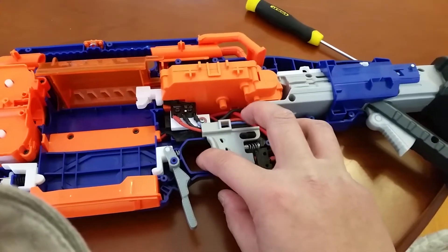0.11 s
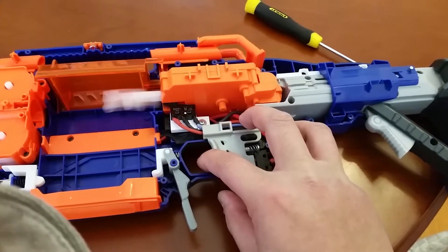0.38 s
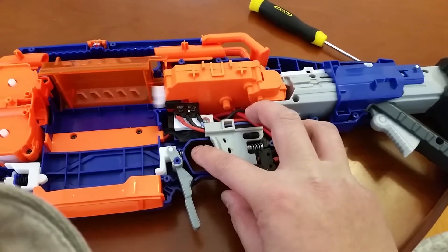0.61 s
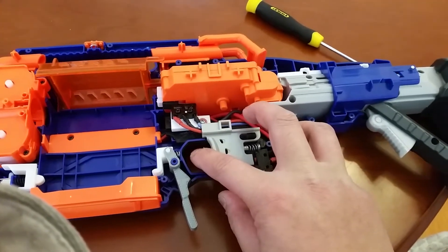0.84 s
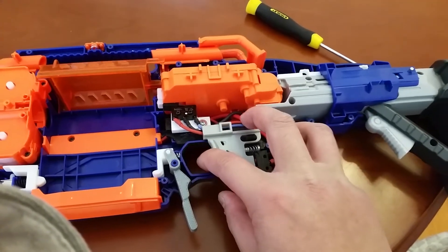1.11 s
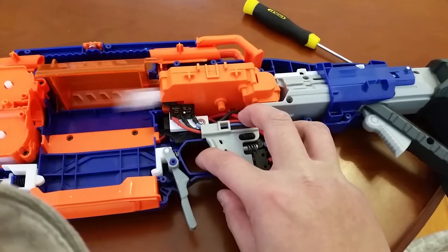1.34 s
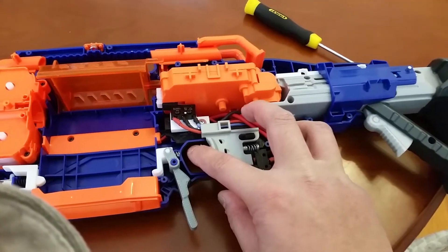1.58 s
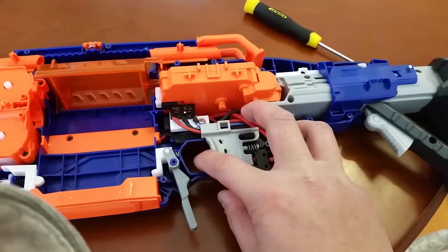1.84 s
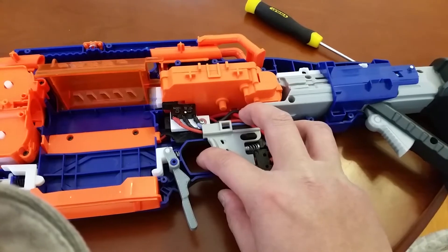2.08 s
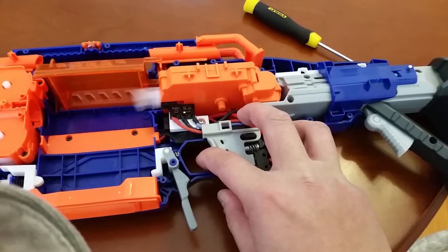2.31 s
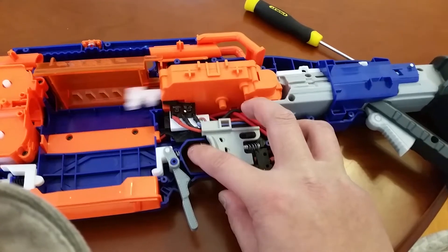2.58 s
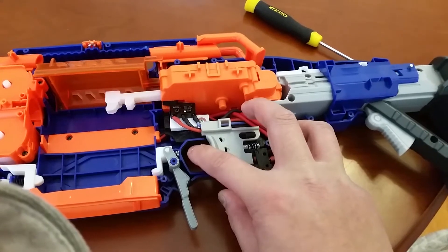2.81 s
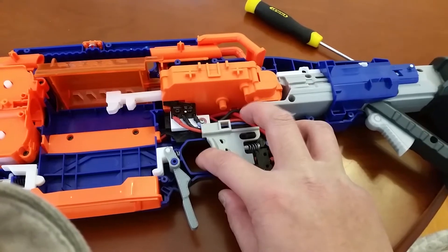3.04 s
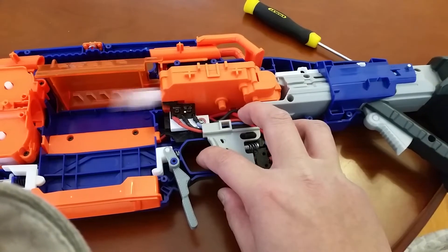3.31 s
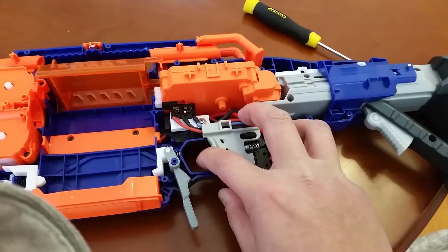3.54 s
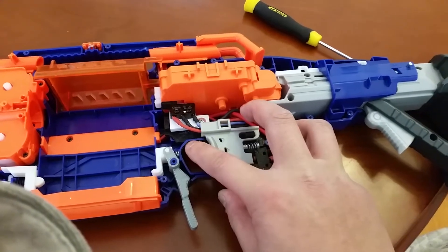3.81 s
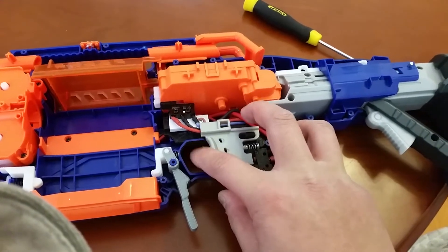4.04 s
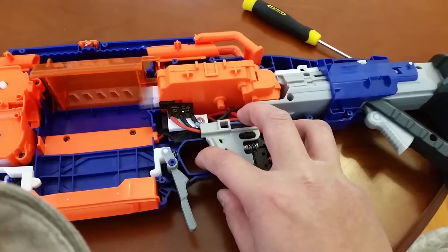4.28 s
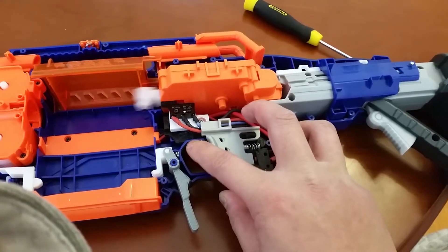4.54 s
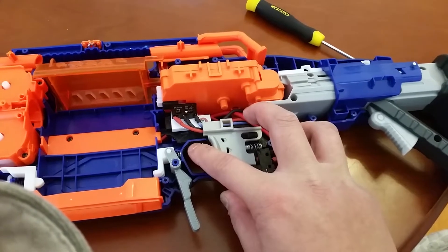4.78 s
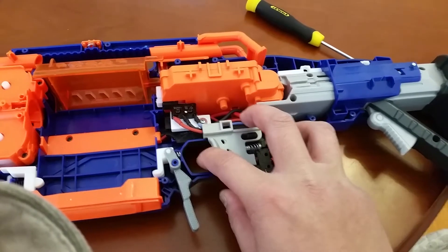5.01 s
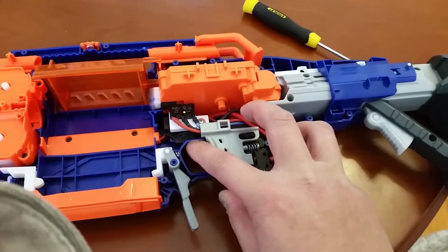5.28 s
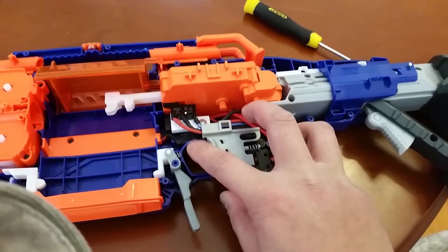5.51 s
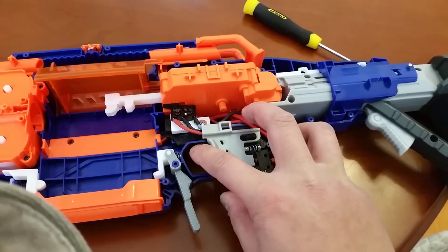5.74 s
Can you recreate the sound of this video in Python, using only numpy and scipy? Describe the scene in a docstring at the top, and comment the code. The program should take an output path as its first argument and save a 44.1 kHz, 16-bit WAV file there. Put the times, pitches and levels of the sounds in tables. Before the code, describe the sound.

An opened toy blaster lies on a table in a quiet, echoing room. Its little electric motor is pressed on six times: each burst jumps up to a harsh, whining gear buzz, then slides down in pitch and stalls. Sharp plastic switch ticks come shortly before the last four bursts. Faint low room rumble and mains hum fill the gaps. Close stereo microphones.

```python
"""Mains hum and room air run throughout; at first the room still rings from a press before time zero.
Six presses follow: a three-pole motor spins up, whines through a plastic gearbox and coasts to rest.
The motor is shaft tones and tooth rattle through resonances of housing, shell and table top; switch
ticks (noise snap, short plastic rings) come shortly before the last four presses.
An opened toy blaster on a table in a quiet, echoing room, heard by two spaced microphones."""
import sys
import numpy as np
from scipy import signal
from scipy.fft import rfft, irfft, next_fast_len
from scipy.io import wavfile
from scipy.ndimage import uniform_filter1d

SR = 44100
rng = np.random.default_rng(int(sys.argv[2]) if len(sys.argv) > 2 else 0)


def volts(x):
    """Linear amplitude factor 10**(x/20) for a level x in dB, scalar or array-like."""
    e = np.asarray(x, float) / 20
    return 10 ** e


def to_wav(sig):
    """Store sig (one row per channel, or 1-D mono) as 16-bit WAV at the path in sys.argv[1].

    Samples outside -1..1 are clipped; the rate is SR.
    """
    pcm = np.clip(np.atleast_2d(sig), -1, 1) * 32767
    pcm = np.round(pcm).astype(np.int16)
    wavfile.write(sys.argv[1], SR, pcm.T)  # frames by channels


N = 259124
LEAD = SR // 2  # samples computed before time zero
SIDES = np.array([[.5], [-.5]])  # splits a left-over-right value between the microphones
TRIO = 3  # noise streams: one common, one for each microphone

# switch presses: on/s, off/s, top shaft speed/Hz, rattle level at switch-off/dB, coast until gears stall/s
PRESSES = [(-.75, -.55, 446, -12.5, .22), (.256, .520, 446, -20.3, .215), (1.208, 1.427, 446, -20.8, .2),
           (2.148, 2.497, 447, -20, .23), (3.251, 3.629, 448, -19, .22), (4.306, 4.477, 448, -20, .22),
           (5.183, 5.318, 449, -19.5, .22)]


def evened(x):
    """Scales to rms 1."""
    return x / np.sqrt(np.mean(x ** 2) + 1e-20)


def read(points, hz):
    """Interpolates a spectrum on a log-frequency axis."""
    f, value = np.transpose(points)
    return np.interp(np.log(hz + 1), np.log(f + 1), value)


def colour(x, response):
    """Filters x by response(hz)."""
    size = next_fast_len(x.shape[-1] + SR // 2)
    spectrum = rfft(x, size) * response(np.fft.rfftfreq(size, 1 / SR))
    return irfft(spectrum, size)[..., :x.shape[-1]]


def drift(size, span_s):
    """Twice-smoothed noise of rms 1."""
    width = max(round(span_s * SR), 1)
    return evened(uniform_filter1d(uniform_filter1d(rng.standard_normal(size), width), width))


def air(same=0.8, own=0.61, level_db=-59):
    """Low rumble and hiss, partly common to both microphones, with wavering mains hum."""
    # room noise spectrum: f/Hz, relative density/dB
    air_spectrum = [(18, -31.5), (35, -6), (60, -2), (150, -1), (228, -2.5), (374, -11.5), (520, -13),
                    (1200, -30), (2310, -21), (6040, -39), (9500, -45), (12200, -41), (15000, -64)]
    # mains harmonics: f/Hz, peak level before waver/dB
    hum_lines = [(120, -79.5), (240, -70.5), (360, -68.5)]
    noise, t = rng.standard_normal((TRIO, N)), np.arange(N) / SR
    mixed = same * noise[0] + own * noise[1:]
    rumble = evened(colour(mixed, lambda hz: volts(read(air_spectrum, hz))))
    hum = sum(volts(db + 5.5 * drift(N, 0.035)) * np.sin(2 * np.pi * (f * t + rng.random()))
              for f, db in hum_lines)
    return volts(level_db + 1.6 * drift(N, .1)) * rumble + hum


def room(x):
    """Diffuse tail, each band dying at its own speed, unlike in the two microphones."""
    # reverberation: f/Hz, t60/s
    decay = [(200, 0.4), (600, 0.65), (1400, 0.57), (2300, 0.61), (3700, 0.63), (9700, 0.42), (14000, 0.17)]
    frame = 256  # samples
    hz, t, z = signal.stft(rng.standard_normal((2, SR)), SR, nperseg=frame)
    dying = z * volts(-60 * t / read(decay, hz)[:, None])
    tail = signal.istft(dying, SR, nperseg=frame)[1][:, :SR]
    tail = tail * np.clip(np.arange(SR) / SR / .012 - .3, 0, 1)  # first walls answer after a few ms
    return signal.fftconvolve(x, tail / np.linalg.norm(tail[0]), axes=1)[:, :x.shape[1]]


def switch(t, snap_decay_s=0.0043, rise_s=0.00038):
    """Each tick is a snap of noise and a few short, damped plastic rings."""
    # ticks: start/s, peak level/dB, left over right/dB, snap share/0-1
    ticks = [(1.94, -37.5, 0.5, 0.45), (3.035, -42.5, 12, 0.1), (3.064, -24.5, 0, 0.45),
             (4.182, -30, 1, 0.4), (5.007, -33, 1, 0.1), (5.024, -29, 0.5, 0.6)]
    # plastic rings: f/Hz, relative level/dB, t60/s
    ring_modes = [(1450, -2, .008), (2420, 0, .009), (3640, -7, .005), (5000, -3, .008), (7000, -10, .005)]
    out, after = np.zeros((2, len(t))), np.arange(2000) / SR
    for s, db, pan_db, snap in ticks:
        rings = np.zeros(len(after))
        for (f, ring_db, t60), chance in zip(ring_modes, rng.random((len(ring_modes), 2))):
            decay = np.exp(-np.log(1000) * after / t60)
            rings += volts(ring_db + 2.8 * chance[0]) * decay * np.sin(2 * np.pi * (f * after + chance[1]))
        noise = evened(signal.lfilter([1], [1, -.55], rng.standard_normal(len(after))))
        tick = rings + snap * noise * np.exp(-after / snap_decay_s)
        tick = tick * np.minimum(after / rise_s, 1)
        at = round(s * SR) + LEAD
        out[:, at:at + len(after)] += volts(db + SIDES * pan_db) * tick / abs(tick).max()
    return out


def table(hz, low_hz=135):
    """Low modes of the table top, little under the lowest."""
    # thrum of the table top under the toy: f/Hz, -6 dB width/Hz, relative level/dB
    top_modes = [(247, 97, -12), (367.6, 291, -11)]
    modes = sum(volts(db - 1.6 * SIDES) / (1 + 2j * (hz - f) / width) ** 2 for f, width, db in top_modes)
    return modes / (1 + (low_hz / (hz + 1)) ** 8.0)


def housing(hz, small_hz=1000):
    """Sum of resonances, each reaching the two microphones with its own level and phase."""
    # housing modes: f/Hz, width/Hz, relative level/dB, left over right/dB, left leads by/rad
    housing_modes = [(1410, 330, 1.5, 3, 3.5), (1944, 296, -2.5, -1, 1.5), (2133, 324, 0.5, 11, 2.5),
                     (2407, 240, 1.5, 8, 4), (3020, 100, -8.5, -8.5, 4.5), (4200, 390, -5, -8, 4),
                     (4877, 550, -3.5, -9, 0.55), (5730, 100, -11.5, 5.5, -3), (7560, 700, -9, 1, -0.5),
                     (8660, 290, -12.5, 1, -0.5), (9500, 830, -3, 1, -2), (10680, 500, -3, 5, 4.5),
                     (11680, 1100, -10, -1, 1.5), (13300, 880, -11, 5, 11.5)]
    modes = sum(volts(db + SIDES * pan_db) * np.exp(1j * SIDES * lead) / (1 + 2j * (hz - f) / width)
                for f, width, db, pan_db, lead in housing_modes)
    return modes / (1 + (small_hz / (hz + 1)) ** 6.37)  # a small body radiates little bass


def shell(hz):
    """Smooth colour of the rattle spread over the whole shell."""
    # shell spectrum: f/Hz, relative level/dB
    shell_spectrum = [(150, -50.5), (240, -7.5), (400, -16), (750, -17), (1150, -10.5), (2300, 1.5),
                      (4500, -9.5), (6500, -9.5), (10000, -9.5), (14300, -16.5), (15000, -49)]
    # shell balance: f/Hz, left over right/dB
    shell_balance = [(300, -0.5), (700, -16), (1500, -13), (3000, -2), (5500, -7), (8500, 4), (14000, 0)]
    return volts(read(shell_spectrum, hz) + SIDES * read(shell_balance, hz))


def shaft_speed(t, spin_up_s=.022, coast_s=.4, drag_hz=497.7):
    """Rises toward top speed under current, then friction (dry part drag_hz) brakes it to rest."""
    speed = np.zeros(len(t))
    for on, off, top_hz, *_ in PRESSES:
        driven = top_hz * (1 - np.exp(-np.clip(np.minimum(t, off) - on, 0, None) / spin_up_s))
        braking = np.exp(-np.clip(t - off, 0, None) / coast_s)
        speed += np.maximum((driven + drag_hz) * braking - drag_hz, 0)
    return speed * (1 + 0.00198 * drift(len(t), 0.0098))


def gear_load(t):
    """Rattle level: builds as the teeth engage, swells under current, sags while coasting and stalls."""
    slack_s, bite_s, rest_s = .015, .007, .044  # bite ends with the slack; rest follows the stall
    start_db, start_s = -6, .035  # rattle lacking at first, and how fast it builds
    swell_db_per_s, sag_db_per_s = 7, 21
    stall_db, stall_s = -5, .025  # drop just before the gears stall
    level = np.zeros(len(t))
    for on, off, _, top_db, coast_s in PRESSES:
        since, left = t - on - slack_s, off + coast_s - t
        bite = np.clip(since / bite_s + 1, 0, 1) ** 1.2
        rest = np.clip(left / rest_s + 1, 0, 1) ** 2.05
        db = top_db - swell_db_per_s * np.maximum(off - t, 0) - sag_db_per_s * np.maximum(t - off, 0)
        db += start_db * np.exp(-np.maximum(since, 0) / start_s)
        db += stall_db * np.exp(-np.maximum(left, 0) / stall_s)
        level += bite * rest * volts(db)
    return level


def whine(t, speed, turns, waver_db=2.8, inrush_db=8):
    """Shaft tones; without current they shine where they cross the gear case resonance."""
    # shaft tones, multiples of three from the commutator:
    # multiple of shaft speed/1, relative level under current/dB, relative level coasting/dB
    shaft_tones = [(2.003, -24.5, -25.5), (2.991, -5.5, 2.5), (4.01, -17, -28.5), (4.995, -13, -23),
                   (6.01, -10, -8), (6.98, -12.5, -20), (8.98, -14, -3), (9.99, -14, -22.5),
                   (11, -16.5, -25), (11.85, -15.5, -9), (15.11, -15, -8), (18.02, -28, -7),
                   (20.44, -19.5, -12)]
    case_hz, case_width_hz, case_floor = 2750, 750, 0.38  # gear case rung by slack teeth
    powered = sum((t > on) * (t < off) * 1. for on, off, *_ in PRESSES)
    driven = uniform_filter1d(powered, round(.015 * SR))
    extra_db = inrush_db * (1 - speed / speed.max())  # a slow rotor draws more current
    phases, out = rng.random(len(shaft_tones)), np.zeros(len(t))
    for (k, db, coast_db), phase in zip(shaft_tones, phases):
        case = case_floor + 1 / (1 + (2 * (k * speed - case_hz) / case_width_hz) ** 2)
        size = driven * volts(db + extra_db) + (1 - driven) * volts(coast_db) * case
        waver = volts(waver_db * drift(len(t), 0.015))
        out += size * waver * np.cos(2 * np.pi * (k * turns + phase))
    return out


def motor(t, pulse=0.97, grain_db=0.5, lurch_db=.9):
    """Shaft tones and tooth rattle, beaten once a turn, drive housing, table and shell."""
    speed = shaft_speed(t)
    turns = np.cumsum(speed) / SR
    beat = 1 + pulse * np.exp(-(turns % 1) / 0.4)
    beat = beat * volts(grain_db * drift(len(t), .0015))  # uneven teeth
    rattle = evened(beat) * rng.standard_normal((TRIO, len(t)))
    level = gear_load(t) * volts(lurch_db * drift(len(t), .012))  # the load lurches
    tones = whine(t, speed, turns)
    from_housing = colour(level * (rattle[0] + tones), housing)
    from_table = colour(level * (rattle[0] + .3 * tones), table)
    from_shell = colour(level * (rattle[1:] + .27 * tones), shell)
    return volts(5.5) * (from_housing + from_table + from_shell)


def scene():
    """Toy, its echo and the room air."""
    t = np.arange(-LEAD, N) / SR
    whir, ticks = motor(t), switch(t)
    echo = room(volts(-9) * whir + volts(-4.5) * ticks)
    return (whir + ticks + echo)[:, LEAD:] + air()


def roll_off(x):
    """The treble ends steeply here."""
    return signal.sosfilt(signal.butter(12, 15800, fs=SR, output="sos"), x)


def record(dry):
    """Soft clipping: the input stage rounds off the highest peaks."""
    limited = .95 * np.tanh(dry / .95)
    return roll_off(limited)


dry = scene()
out = record(dry)
to_wav(out)
```